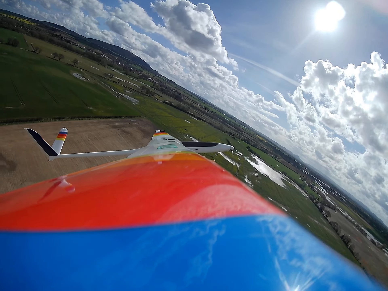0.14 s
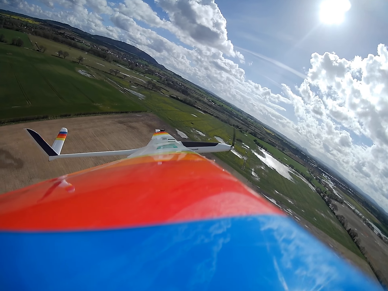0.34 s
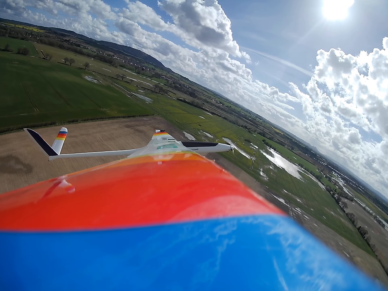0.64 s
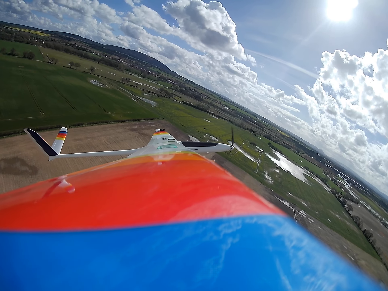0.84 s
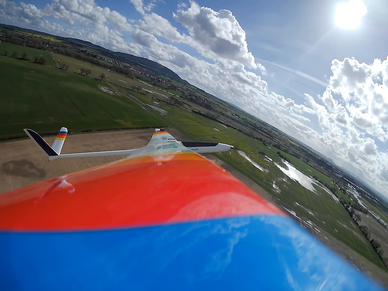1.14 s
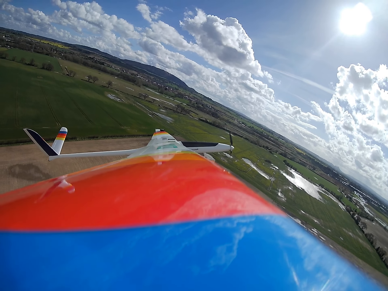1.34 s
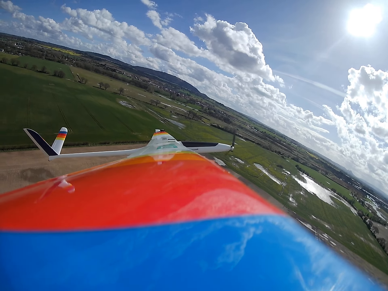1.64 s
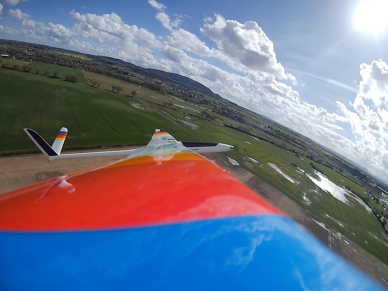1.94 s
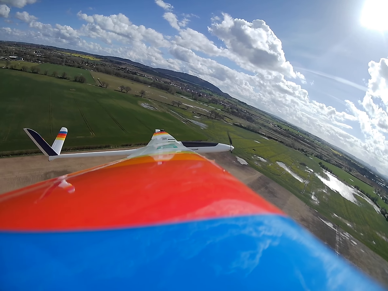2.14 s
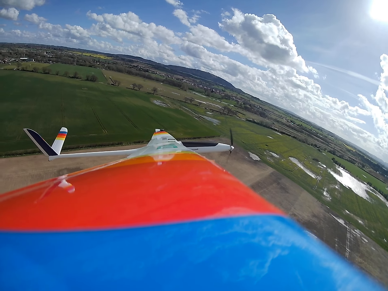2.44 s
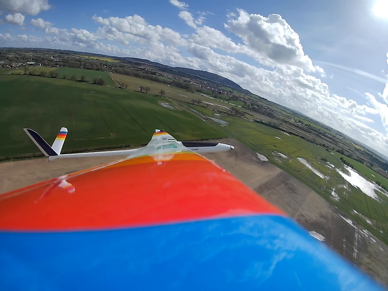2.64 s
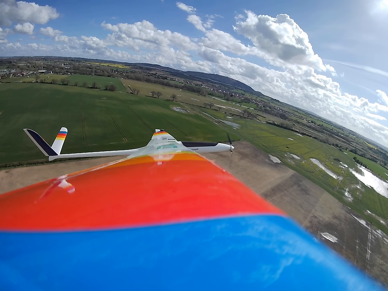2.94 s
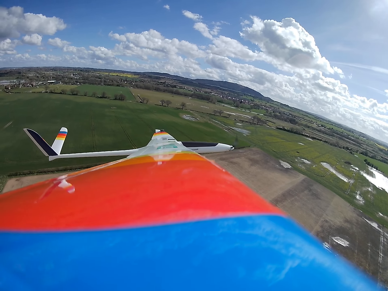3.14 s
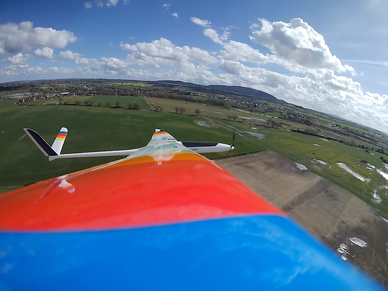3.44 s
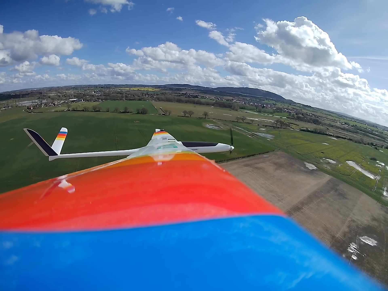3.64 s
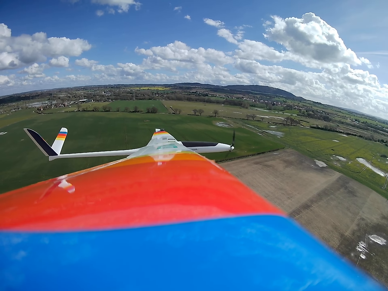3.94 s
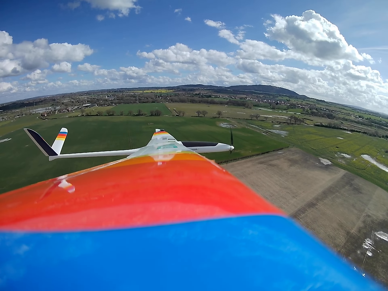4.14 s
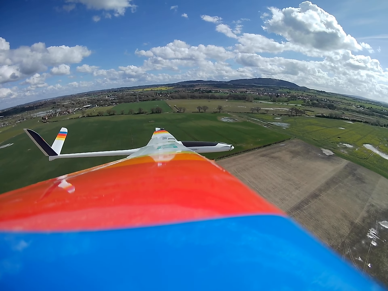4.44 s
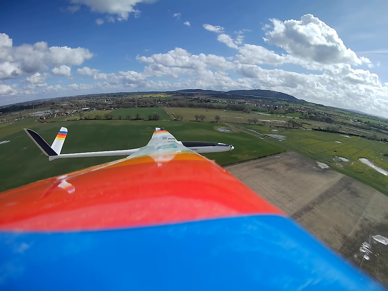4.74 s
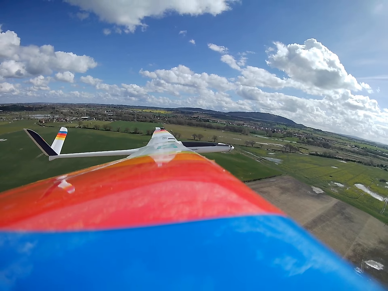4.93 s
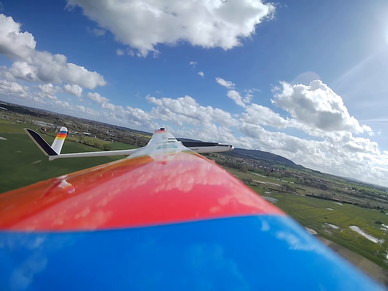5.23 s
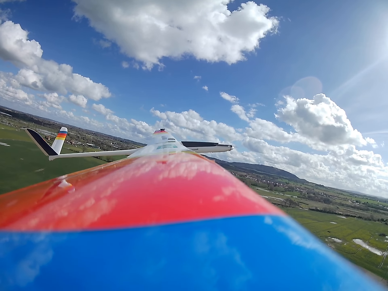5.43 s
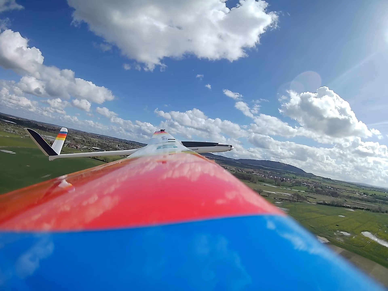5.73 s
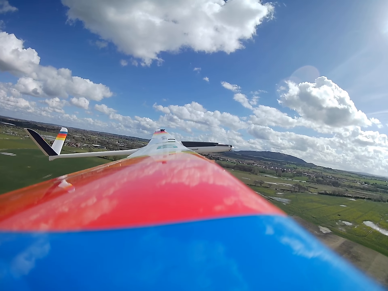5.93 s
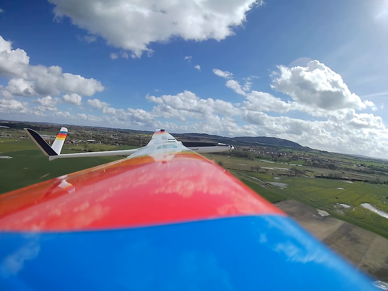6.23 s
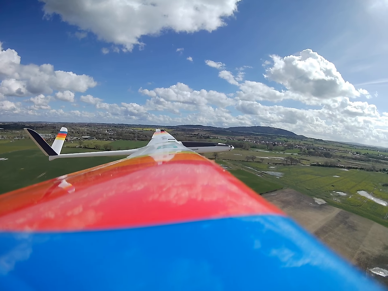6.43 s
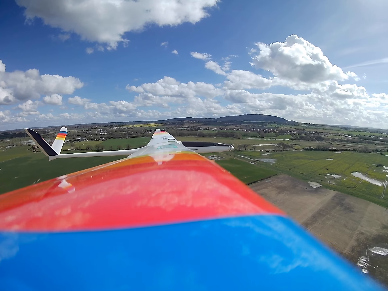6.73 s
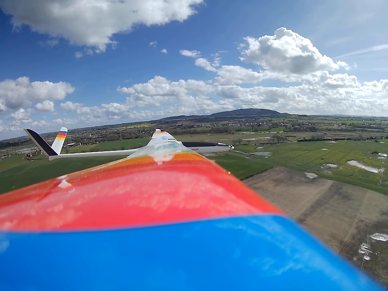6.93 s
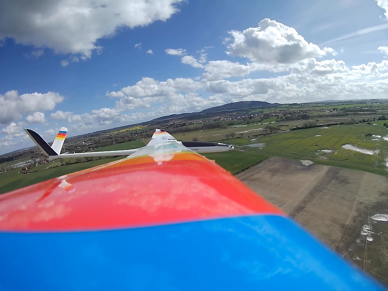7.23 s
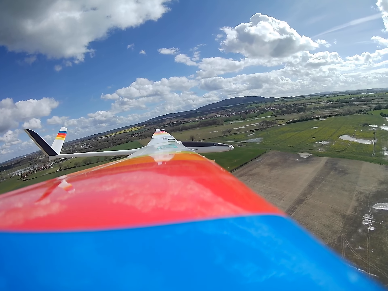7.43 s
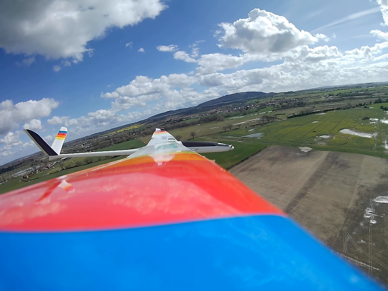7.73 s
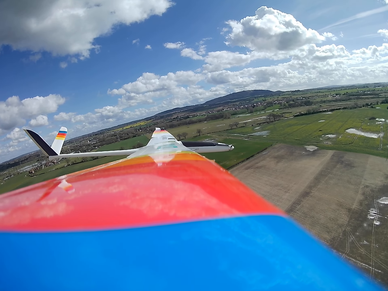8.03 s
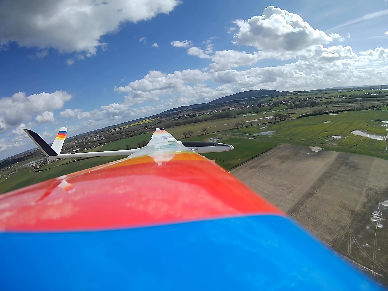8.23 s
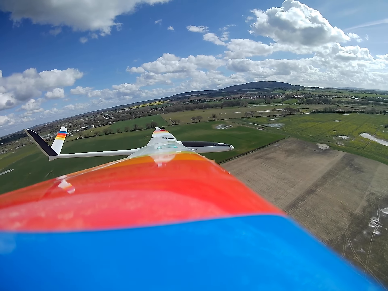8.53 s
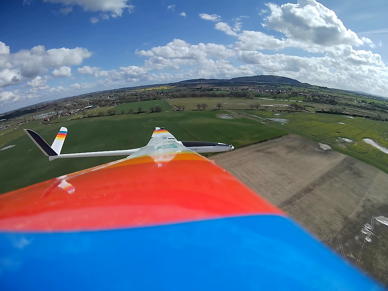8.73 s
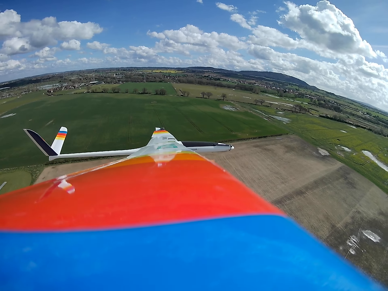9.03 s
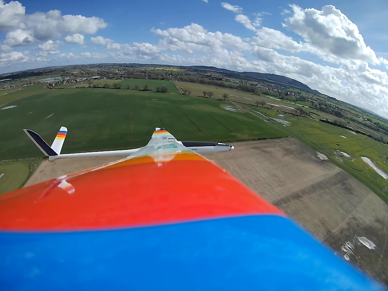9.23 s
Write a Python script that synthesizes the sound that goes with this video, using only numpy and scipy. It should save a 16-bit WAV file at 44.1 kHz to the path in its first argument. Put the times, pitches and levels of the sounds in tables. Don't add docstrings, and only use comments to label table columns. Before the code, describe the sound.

Outdoors in the open air, unshielded wind dominates throughout: deep fluttering rumble and a broad, muffled rush with thin, grainy treble. An electric motor and propeller add a faint buzzing whine and hiss for the first four seconds, slowing after a pair of pops and then stopping. Only airflow remains, sinking to a low, duller burble around six seconds, then brightening and strengthening with puffs and gusts.

```python
import sys
import numpy as np
from scipy import signal
from scipy.fft import rfft, irfft
from scipy.io import wavfile
from scipy.ndimage import uniform_filter1d

SR = 44100
rng = np.random.default_rng(int(sys.argv[2]) if len(sys.argv) > 2 else 0)


def inscribe(sig):
    pcm = np.round(np.clip(np.atleast_2d(sig).T, -1, 1) * 32767)
    wavfile.write(sys.argv[1], SR, pcm.astype(np.int16))


def undo_db(level):
    steps = np.asarray(level, float) / 20
    return 10 ** steps


N = 413195
TIME, FREQ = np.arange(N) / SR, np.fft.rfftfreq(N, 1 / SR) + 1e-3
CRUISE_DB = -30


def curves(table):
    s, *columns = np.transpose(table)
    return [np.interp(TIME, s, c) for c in columns]


def colour(table):
    hz, db = np.transpose(table)
    return undo_db(np.interp(np.log(FREQ), np.log(hz), db))


def walk(rate):
    hold = int(SR / rate)
    steps = np.repeat(rng.standard_normal(N // 200), hold)[:N]
    steps = uniform_filter1d(uniform_filter1d(steps, hold), hold)
    steps -= uniform_filter1d(steps, size=SR // 3)
    return steps / np.std(steps)


def tones(base_hz, turns, orders, dbs, wobble_db):
    out = 0
    for order, db in zip(orders, dbs):
        level = undo_db(db + wobble_db * walk(13)) * np.sqrt(2)
        cycles = base_hz * TIME + order * turns + rng.random()
        out = out + level * np.sin(2 * np.pi * cycles)
    return out


# t/s, airspeed as rush level/dB, burble off the wing level/dB
AIRFLOW = [(0, -29, 1.5), (.45, -30, 3.5), (.7, -30, -1.5), (2.2, -30.5, 0.5), (2.75, -30, 0),
           (3.75, -28.5, -2), (4.4, -28.5, 0.5), (4.75, -30.5, -2.5), (5.3, -34.5, 0.5), (5.5, -35.5, 1),
           (5.9, -36.5, 3), (6.4, -42, 3), (6.9, -39, -0.5), (7.6, -37.5, 0.5), (7.9, -34.5, 2),
           (8.25, -31, 1), (8.6, -30, 2), (9.37, -31, 0.5)]
LAYER_HZ = (300, 28, 1800, 5300)
# f/Hz, level/dB per Hz
EDDIES = [(4, -1.5), (9, 3), (25, 4), (60, 1.5), (120, -0.5), (250, 0), (600, -3.5), (1000, -7),
          (1600, -13), (2500, -19), (3600, -30.5)]
# f/Hz, level/dB per Hz
LOBES = [(5000, -3.5), (6000, -14.5), (7000, -23.5), (7800, -29), (9000, -22), (10800, -23.5),
         (12000, -29.5), (13000, -25), (14200, -46), (16000, -52.5)]
# t/s, extra bass level/dB, half length/s
GUSTS = [
    (.3, 3.5, 0.12),
    (2.692, 0, .05),
    (3.675, 5, 0.078),
    (4.375, 3.5, 0.042),
    (5.03, 3, 0.023),
    (7.11, 2.5, .04),
    (7.827, 5, 0.026),
    (8.3, 4, 0.066),
    (8.597, 3.5, .05),
]
SPEED_LAW = (0.86, 0.55, 1.16, 1.76, 2.4)
GUST_REACH = (0.87, 0.35, .2, .2, .3)
SHIMMER_DB = (.3, 0.37, 0.15, 0.66, 1.2)


def eddy_noise():
    spikes_per_s, spike_share, spike_hz = 200, .12, 1800
    spikes = (rng.random(N) < spikes_per_s / SR) * np.clip(rng.standard_normal(N), -2, 2)
    share = spike_share / (1 + (FREQ / spike_hz) ** 2) * (FREQ > 60)
    push = rfft(rng.standard_normal(N)) * np.sqrt(1 - share)
    push += rfft(spikes / np.std(spikes)) * np.sqrt(share)
    eddies = push * colour(EDDIES + [(hz, db + EDDIES[-1][1]) for hz, db in LOBES])
    return eddies / np.std(irfft(eddies * (FREQ > 100) * (FREQ < 700), N))


def wind():
    roar_db, gust_db, patch_db, flicker_db = -23, 0.1, 0.32, 0.31
    rush, burble = curves(AIRFLOW)
    eddies = eddy_noise()
    tilt = np.outer(SPEED_LAW, rush - CRUISE_DB)
    tilt[0] += burble
    gusts = sum(db * np.exp(-((TIME - s) / half) ** 2) for s, db, half in GUSTS)
    tilt += np.outer(GUST_REACH, gusts)
    tilt += np.outer(SHIMMER_DB, walk(10))
    knots = np.log2(sorted(LAYER_HZ) + [10000])
    gust, patch, out = walk(20), walk(11), 0
    for octave in np.arange(3, 14.6, .5):
        band = np.cos(np.pi * np.clip(np.log2(FREQ) - octave, -.5, .5)) ** 2
        band[FREQ < 8] = octave == 3
        place = np.interp(octave, knots, np.arange(len(knots)))
        low = min(int(place), len(knots) - 2)
        slope = tilt[low] + (place - low) * (tilt[low + 1] - tilt[low])
        patch = 0.75 * patch + 0.33 * walk(13)
        out = out + irfft(eddies * band, N) * undo_db(slope + patch_db * patch + flicker_db * walk(30))
    return out * undo_db(roar_db + gust_db * gust)


# t/s, peak level/dB, width/ms
SLAPS = [
    (2.795, -6.5, 0.25),
    (2.851, -12, 0.24),
    (7.6938, -15, 0.33),
]


def slaps():
    def spike(s, ms):
        return np.exp(-abs(TIME - s) / (ms / 1000))

    out = np.zeros(N)
    for s, db, ms in SLAPS:
        swing = .5 * spike(s - .0006, 2 * ms) - .5 * spike(s + .0001, 1.5 * ms)
        out += undo_db(db + 4) * (spike(s + .0023, ms) + swing)
    return irfft(rfft(out) / (1 + (FREQ / 6000) ** 6), N)


# f/Hz, level/dB per Hz
BLADE_HISS = [(8000, -34), (9000, -21), (10300, -23), (11200, -1), (12300, -1), (13200, -3), (14000, -17.5),
              (15300, -10), (16500, -9)]


def propeller(turns, speed_db, full):
    level_db, speed_law, windmill_db = -61.5, .6, 3
    puff = np.exp(.9 * np.cos(4 * np.pi * turns) + .15 * np.cos(2 * np.pi * turns))
    hiss = irfft(rfft(rng.standard_normal(N) * puff) * colour(BLADE_HISS), N)
    level = level_db + speed_law * speed_db + windmill_db * (1.5 - full) + .6 * walk(15)
    return hiss / np.std(hiss) * undo_db(level)


# t/s, f/Hz, level/dB
BRAKE = [
    (4.02, 12900, -130),
    (4.05, 12650, -70),
    (4.1, 12050, -63),
    (4.13, 11650, -66),
    (4.17, 11300, -130),
]


def brake_squeal(turns):
    hz, db = curves(BRAKE)
    passes = np.cos(2 * np.pi * turns) ** 12 * 4
    return undo_db(db) * passes * np.sin(2 * np.pi * np.cumsum(hz) / SR)


# t/s, f/Hz, half length/s, level/dB
FOLD = (4.205, 9200, .04, -64)


def blade_fold():
    s, hz, half, db = FOLD
    return undo_db(db) * np.exp(-((TIME - s) / half) ** 2) * np.sin(2 * np.pi * hz * TIME)


# t/s, speed/turns per s
SHAFT = [
    (2.8, 118.68),
    (3.05, 111.2),
    (3.2, 107.2),
    (3.6, 100.3),
    (3.8, 91),
    (3.9, 83.5),
    (4.0, 70),
    (4.06, 37),
    (4.2, 33),
]
POLE_ORDERS = (2, 21, 42)
POLE_DB = (-37.5, -45.5, -63.5)
DRIVE_ORDERS = (14.56, 15.9, 29.12)
DRIVE_DB = (-45.5, -50, -67)
SIDE_ORDERS = (0, 6, 8, 10, 11, 12, 14)
SIDE_DB = (-76, -89, -88, -82.5, -80.5, -85, -82)
LOADED_ORDERS = (17, 19, 23, 26, 27, 29, 31, 33, 35, 37, 39)
LOADED_DB = (-90, -82, -82, -85, -75, -90, -77, -70, -78, -80, -78)


def motor():
    chopping_hz, full_turns = 7989, 118.68
    speed = curves(SHAFT)[0]
    turns = np.cumsum(speed * (1 + .0012 * walk(8.3))) / SR
    speed_db = 20 * np.log10(speed / full_turns)
    full = np.clip(1 - (TIME - 3.2) / .1, 0, 1)
    turning = np.clip(1 - (TIME - 4.15) / .05, 0, 1) ** 2
    mount = 1 / np.hypot(1, (speed - 106.6) / 5.3)
    out = propeller(turns, speed_db, full)
    out += full * tones(0, turns, POLE_ORDERS, POLE_DB, 0.5)
    out += mount * undo_db(8 + 1.5 * speed_db) * tones(0, turns, DRIVE_ORDERS, DRIVE_DB, 0.6)
    out += undo_db(7.5 + 2.5 * speed_db) * tones(chopping_hz, turns, SIDE_ORDERS, SIDE_DB, 1.7)
    out += full * tones(chopping_hz, turns, LOADED_ORDERS, LOADED_DB, 2.5)
    out += brake_squeal(turns)
    return out * turning + blade_fold()


# f/Hz, level/dB per Hz
TICK_RING = [(6000, -22), (11500, -15.5), (12900, -1), (13500, -6.5), (14500, -23)]


def ticks():
    ticks_per_s, length_s, level_db, speed_law, scatter_db = 11, .006, -76, .8, 2
    ring = irfft(rfft(rng.standard_normal(N)) * colour(TICK_RING), N)
    chance = rng.random((200, 2))
    starts = np.cumsum(.4 + 1.2 * chance[:, 0]) / ticks_per_s
    inside = starts < TIME[-1]
    marks = np.zeros(N)
    marks[(starts[inside] * SR).astype(int)] = undo_db(scatter_db * 4 * (chance[inside, 1] - .5))
    bell = np.exp(-(np.arange(-1000, 1001) / SR / length_s) ** 2)
    level = undo_db(level_db + speed_law * (curves(AIRFLOW)[0] - CRUISE_DB))
    return ring / np.std(ring) * signal.fftconvolve(marks, bell, "same") * level


def self_noise():
    return undo_db(-87.5) * rng.standard_normal(N)


def scene():
    return (wind() + slaps() + motor() + ticks() + self_noise())[None]


NULL_HZ = (4500, 6525, 7420, 8204, 9798, 14879)
NULL_WIDTH_HZ = (410, 305, 300, 350, 222, 150)
NULL_DEPTH = (1, 2, 2, 2, 2, 1)


def low_pass(x):
    gain = np.ones(len(FREQ))
    for hz, width, depth in zip(NULL_HZ, NULL_WIDTH_HZ, NULL_DEPTH):
        gain *= (abs(FREQ - hz) / np.hypot(FREQ - hz, width)) ** depth
    return irfft(rfft(x) * gain, N)


def masking(x):
    below_db, scatter_db, top_db = 12.5, 10, 4.5
    hz, _, cells = signal.stft(x, SR, nperseg=2048, boundary="even")
    hz = hz[:, None]
    power = uniform_filter1d(abs(cells) ** 2, size=6, axis=-2)
    around = uniform_filter1d(uniform_filter1d(power, size=5, axis=-1), 130, axis=-2)
    ragged = uniform_filter1d(rng.standard_normal(power.shape), size=4, axis=-2)
    ragged = uniform_filter1d(ragged, size=2, axis=-1)
    threshold_db = scatter_db * ragged - below_db + top_db * (hz > 13700)
    keep = (power > around * undo_db(2 * threshold_db)) | (hz < 6100)
    return signal.istft(cells * keep, SR, nperseg=2048)[1][..., :N]


def band_limit(x):
    return signal.sosfilt(signal.butter(12, 15730, fs=SR, output="sos"), x)


def record(dry):
    mix = masking(low_pass(dry))
    return band_limit(mix)


dry = scene()
out = record(dry)
inscribe(out)
```